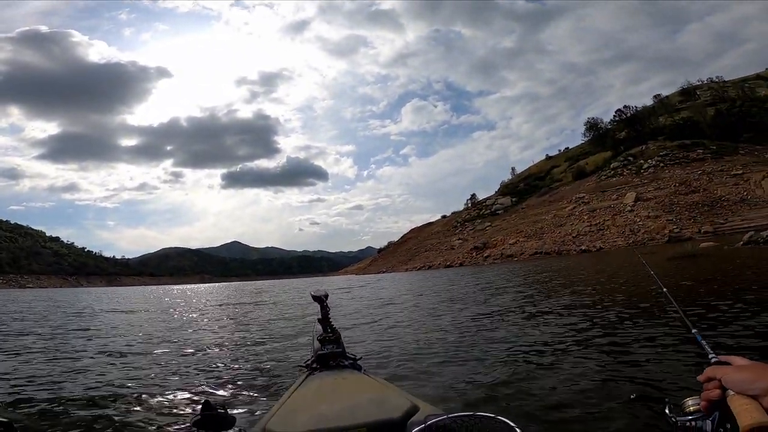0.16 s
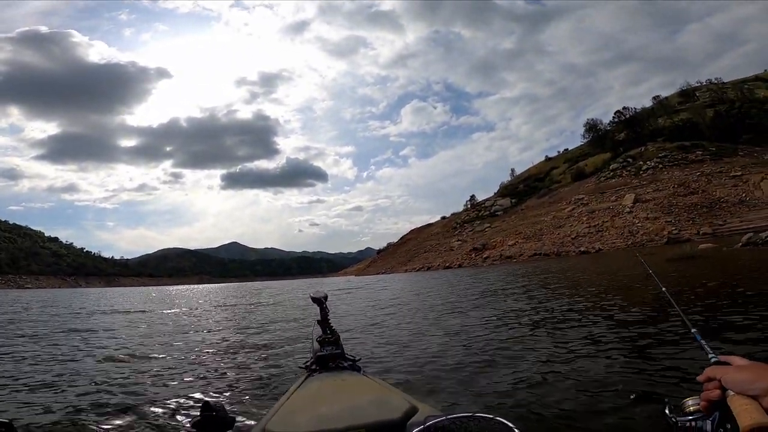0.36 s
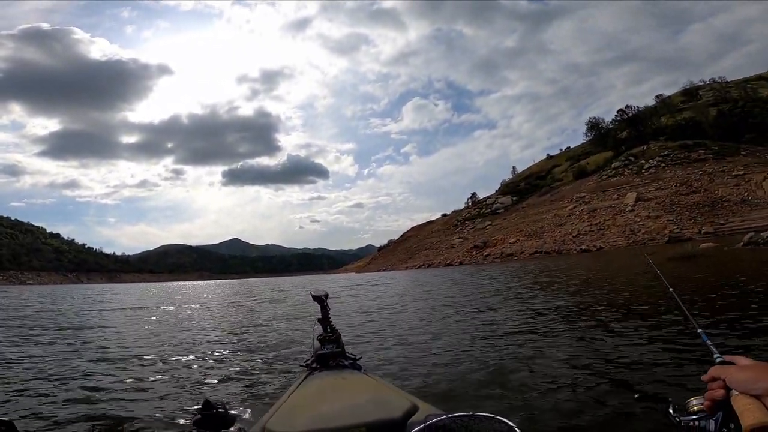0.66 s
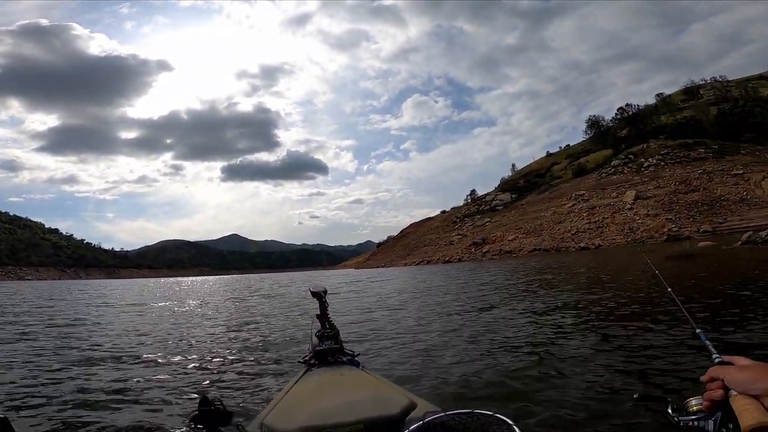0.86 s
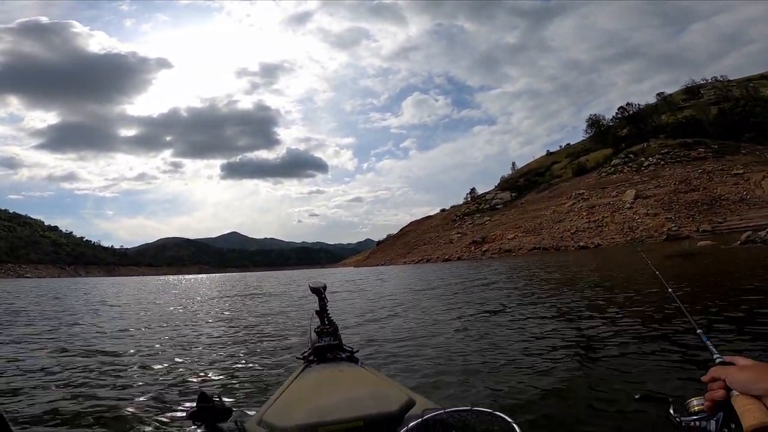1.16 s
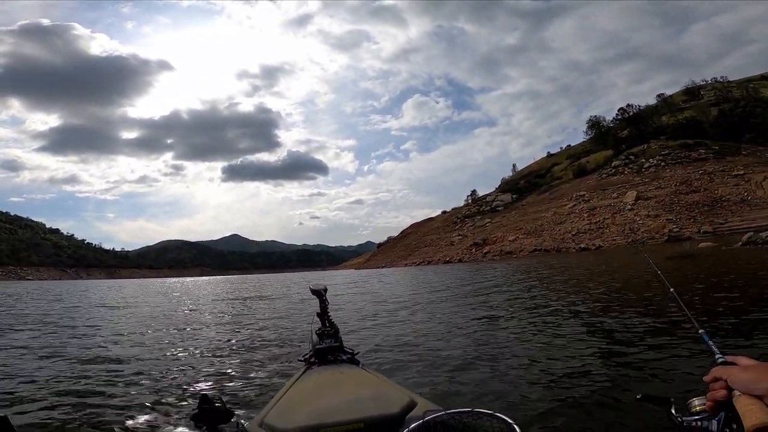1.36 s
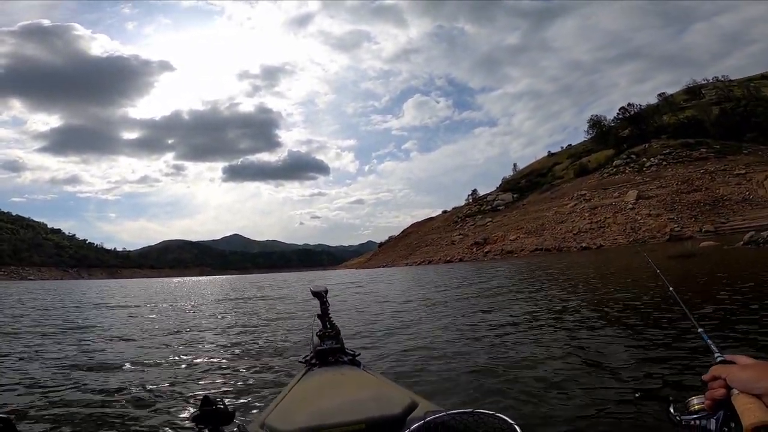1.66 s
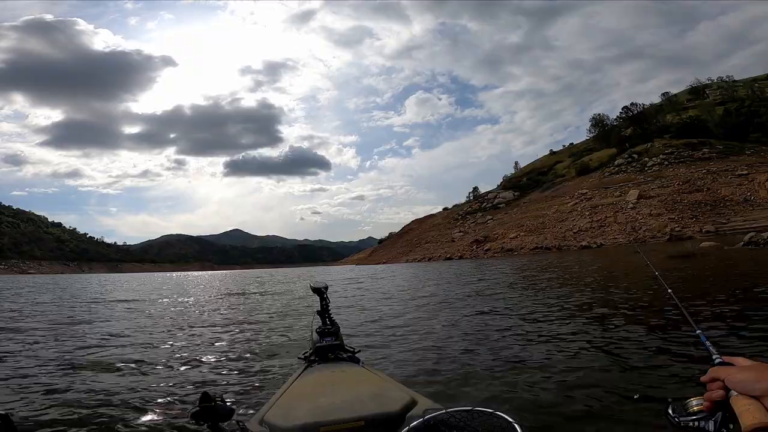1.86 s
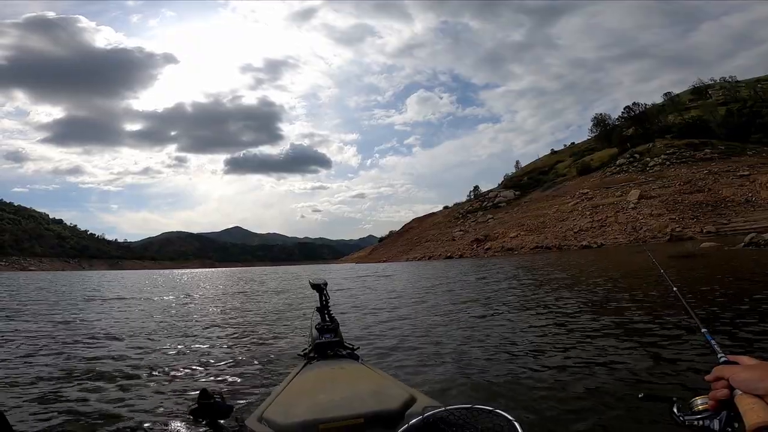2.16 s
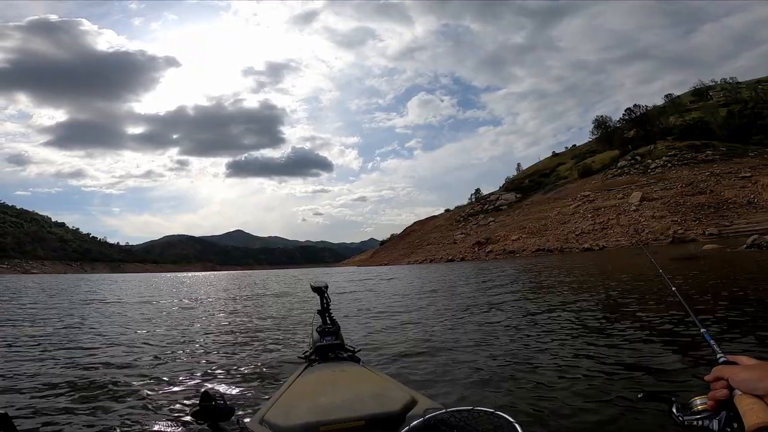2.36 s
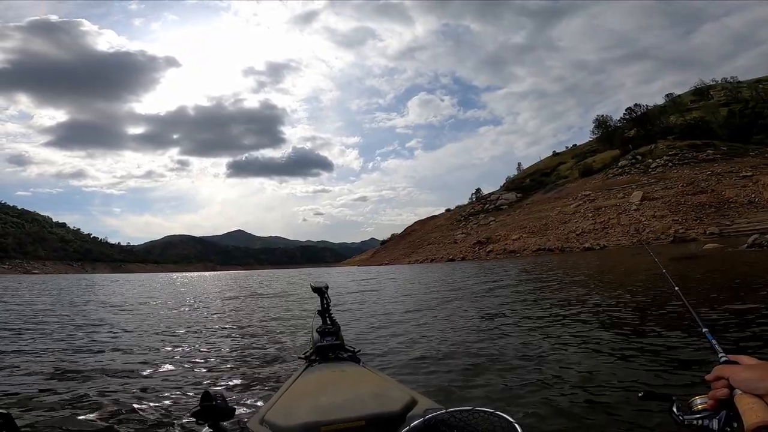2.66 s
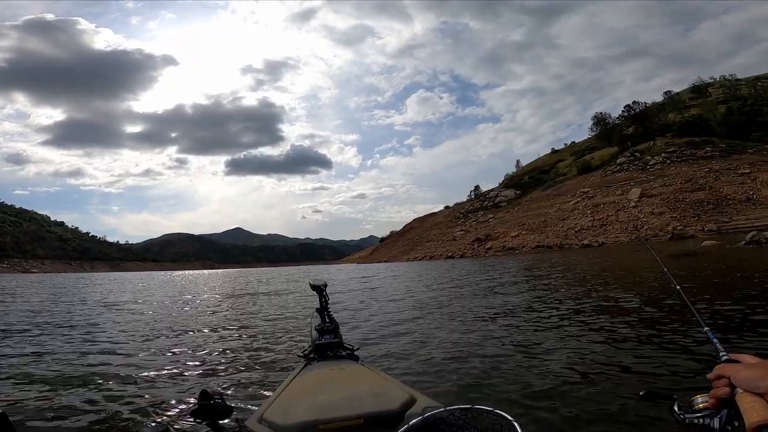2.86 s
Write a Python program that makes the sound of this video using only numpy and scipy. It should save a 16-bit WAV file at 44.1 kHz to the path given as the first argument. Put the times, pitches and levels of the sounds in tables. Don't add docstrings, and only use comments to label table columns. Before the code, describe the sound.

Small waves lap a hollow plastic kayak, close and quiet, in mono outdoors. A soft slap at 0.15 s, deep thuds around 0.4-0.6, hollow knocks at 0.8-0.9. A splashy, bubbly cluster runs 1.3-1.6, then ticking drips. Low glugs at 2.1, the sharpest plop and splash at 2.5, then bubbles and drips to the end. Faint trickling, low wind and hull rumble, and a dull distant wash lie beneath.

```python
import sys
import numpy as np
from scipy import signal
from scipy.fft import rfft, irfft, next_fast_len
from scipy.io import wavfile
from scipy.ndimage import uniform_filter1d, map_coordinates

SR = 44100
rng = np.random.default_rng(int(sys.argv[2]) if len(sys.argv) > 2 else 0)


def pcm_store(signal):
    levels = np.round(np.clip(np.atleast_2d(signal), -1, 1) * 32767)
    wavfile.write(sys.argv[1], SR, levels.astype(np.int16).T)


def voltage_ratio(level):
    return 10 ** (np.asarray(level, float) / 20)


N = 132300


def unit(x):
    return x / np.sqrt(np.mean(x ** 2) + 1e-20)


def level_at_each_sample(rows):
    times_s, levels_db = np.transpose(rows)
    return voltage_ratio(np.interp(np.arange(N) / SR, times_s, levels_db))


def wobble(rate):
    knots = rng.standard_normal(400)
    return map_coordinates(knots, [np.arange(N) * rate / SR])


def coloured(x, points):
    size = next_fast_len(N + 8192)
    point_hz, point_db = np.transpose(points)
    hz = np.fft.rfftfreq(size, 1 / SR)
    gain_db = np.interp(np.log(hz + 1), np.log(point_hz + 1), point_db, right=-120)
    return irfft(rfft(x, size) * voltage_ratio(gain_db), size)[:N]


def rush(points, patchy_db):
    spectrum = signal.stft(rng.standard_normal(N), nperseg=256)[2]
    patches = uniform_filter1d(rng.standard_normal(spectrum.shape), size=6, axis=0)
    patches = unit(uniform_filter1d(patches, size=6, axis=1))
    noise = signal.istft(spectrum * voltage_ratio(patchy_db * patches), nperseg=256)[1][:N]
    return unit(coloured(noise, points))


def pings(start_s, level_db, hz, cycles, rise, soft, size):
    t = np.arange(size) / SR
    age = t * (hz / np.maximum(cycles, 0.3))[:, None]
    fade_out = np.cos(np.pi / 2 * t / t[-1])
    shape = np.exp(-age) * (1 - np.exp(-age / max(soft, 0.01))) * fade_out
    glide = 1 + rise * np.minimum(age, 4) / 2
    wave = np.sin(2 * np.pi * hz[:, None] * t * glide)
    at = np.round(start_s * SR).astype(int)[:, None] + np.arange(size)
    return np.bincount(at.ravel(), (voltage_ratio(level_db)[:, None] * shape * wave).ravel(), N + size)[:N]


def swarm(centre_hz, spread, cycles, rise, scatter_db, count, size):
    when, big = rng.random((count, 2)).T
    pitch, life = rng.standard_normal((count, 2)).T
    hz = centre_hz * np.exp(spread * np.clip(pitch, -2, 2))
    level_db = -scatter_db * np.log(1.05 - big) - 4 * spread * pitch
    lifetimes = cycles * np.exp(0.4 * life)
    return unit(pings(when * N / SR, level_db, hz, lifetimes, rise, soft=1.0, size=size))


def camera_hiss():
    # frequency_hz, gain_db
    hiss_colour = [(100, -5), (700, -14), (6500, -30.5), (11500, -50), (14300, -44.5), (15500, -52)]
    return voltage_ratio(-71.5) * rush(hiss_colour, patchy_db=1)


def far_shore():
    # time_s, level_db
    shore_level = [(0, -94.5), (1.55, -72), (1.72, -64), (2.3, -61), (2.55, -65.5), (3, -74)]
    # frequency_hz, gain_db
    shore_colour = [(800, -21), (1400, -4.5), (1850, -1.5), (2200, -16), (3300, -15.5), (10000, -42.5),
                    (14300, -45.5)]
    return level_at_each_sample(shore_level) * rush(shore_colour, patchy_db=-4.5)


def breeze():
    # time_s, level_db
    gusts = [(0, -59), (.33, -55.5), (.4, -46), (.75, -45), (.95, -49), (1.1, -55), (1.24, -45),
             (1.45, -48), (1.65, -54.5), (2.02, -56.5), (2.12, -47.5), (2.27, -58.5), (3, -54)]
    # frequency_hz, gain_db
    buffet_colour = [(12, -120), (20, -9.5), (35, -2), (60, -4.5), (120, -18), (300, -57)]
    return voltage_ratio(-0.5) * level_at_each_sample(gusts) * rush(buffet_colour, patchy_db=1.15)


def hull_boom():
    # time_s, level_db
    swell = [(0, -55), (.07, -57.5), (.55, -56), (.75, -58), (.92, -48.5), (1.1, -55.5), (1.25, -54.5),
             (1.55, -53), (2.0, -58.5), (2.18, -50.5), (2.26, -56.5), (2.62, -57.5), (2.85, -55), (3, -55)]
    # frequency_hz, gain_db
    hull_colour = [(60, -17.5), (85, -3.5), (110, 3.5), (140, -7), (200, -9), (500, -30.5)]
    boom = unit(voltage_ratio(0.92 * wobble(15)) * rush(hull_colour, patchy_db=-0.17))
    return voltage_ratio(-2.0) * level_at_each_sample(swell) * boom


def wash():
    # time_s, level_db
    flow = [(0, -69.5), (.1, -73.5), (.22, -75.5), (.3, -70.5), (.53, -67.5), (.65, -70), (.76, -75.5),
            (1.02, -75), (1.1, -72), (1.2, -74), (1.36, -64.5), (1.55, -67.5), (1.85, -67.5), (2.0, -69.5),
            (2.46, -63.5), (2.58, -70.5), (2.85, -68.5), (3, -70)]
    # frequency_hz, gain_db
    trickle_colour = [(150, -24), (500, 1.5), (1100, -6), (1800, -2), (2600, -8.5), (5000, -15),
                      (8500, -19.5), (11500, -39.5), (14500, -44)]
    spurts_db = 2.9 * wobble(22.01) + 1.04 * wobble(45)
    sheet = unit(voltage_ratio(spurts_db) * rush(trickle_colour, patchy_db=3.0))
    gurgle = swarm(centre_hz=600, spread=0.342, cycles=7.9, rise=0.055, scatter_db=-0.5, count=200, size=2000)
    bubbling = swarm(centre_hz=1800, spread=0.416, cycles=5.9, rise=0.042, scatter_db=1.5, count=600, size=900)
    fizz = swarm(centre_hz=5514, spread=0.22, cycles=11, rise=0.0062, scatter_db=1.0, count=600, size=600)
    crackle = swarm(centre_hz=4700, spread=0.36, cycles=0.52, rise=0, scatter_db=2.5, count=300, size=200)
    crackle = coloured(crackle, [(1000, 9.5), (8500, 0.0), (11500, -11), (15000, -18)])
    grains = voltage_ratio(-4) * bubbling + voltage_ratio(-14) * fizz + voltage_ratio(-17.5) * crackle
    water = voltage_ratio(3.0) * sheet + voltage_ratio(-1.0) * gurgle + voltage_ratio(0.23 * spurts_db + 2.0) * grains
    return level_at_each_sample(flow) * water


def surges():
    # start_s, level_db (rms), centre_hz, length_s
    froth = [(.0, -68.5, 1800, 0.015), (0.507, -61, 1350, 0.056), (0.618, -62.5, 710, 0.04),
             (0.81, -63, 625, 0.056), (0.884, -64, 1800, 0.023), (.885, -83, 5130, 0.025),
             (2.397, -68, 3200, 0.097), (0.829, -76, 4270, 0.06), (1.218, -68.5, 3200, 0.024),
             (1.333, -55, 820, 0.038), (1.336, -65.5, 3300, 0.038), (1.455, -68.5, 2630, 0.22),
             (1.452, -58, 320, 0.097), (1.562, -80, 600, 0.016), (2.067, -62.5, 553, 0.11)]
    hz, t, spectrum = signal.stft(rng.standard_normal(N), SR, nperseg=256)
    power = 0
    for start_s, level_db, centre_hz, length_s in froth:
        band = np.exp(-(np.log((hz + 1) / centre_hz) / 0.29) ** 2)
        age_s = np.maximum(t - start_s, 0)
        envelope = (1 - np.exp(-age_s / 0.0037)) * np.exp(-(age_s / length_s) ** 2)
        power = power + voltage_ratio(2 * level_db) * np.outer(band / band.mean(), envelope)
    noise = signal.istft(spectrum * np.sqrt(power), nperseg=256)[1][:N]
    return voltage_ratio(2.67 * wobble(90)) * noise


def ticks():
    # start_s, level_db (peak), centre_hz
    tiny_drops = [(.343, -61.5, 8400), (0.5128, -63, 9000), (0.5624, -64, 9000), (.583, -63, 5300),
                  (0.6325, -59, 7780), (.8853, -63, 5250), (1.034, -70, 7080), (1.074, -61, 4530),
                  (1.2265, -59, 8100), (1.3058, -63, 8310), (1.3487, -57, 8470), (1.498, -56, 6600),
                  (1.618, -56, 5700), (1.653, -53.5, 7300), (1.7019, -59, 6060), (1.709, -60, 9100),
                  (1.771, -58, 6590), (1.813, -55, 4500), (1.8495, -60, 8710), (1.864, -59, 6100),
                  (2.037, -57, 6800), (2.1503, -57, 4950), (2.4393, -55, 5950), (2.454, -54, 6660),
                  (2.633, -56, 5700), (2.66, -63, 5850), (2.775, -62, 6340), (2.802, -65, 8350),
                  (2.8463, -53.5, 6090), (2.9008, -55, 5970), (2.9205, -56, 4540), (2.9576, -59, 5220),
                  (2.9686, -61, 5960)]
    # start_s, level_db (peak)
    spray = [
        (1.709, -74),
        (2.171, -72),
        (2.8992, -74),
        (2.9207, -72),
        (2.9686, -78),
    ]
    start_s, level_db, hz = np.transpose(tiny_drops)
    clicks = pings(start_s, level_db + 6.5, hz, 3.1 + 0 * start_s, rise=0.015, soft=0.1, size=300)
    start_s, level_db = np.transpose(spray)
    hz = 12900 + 0 * start_s
    return clicks + pings(start_s, level_db + 5.5, hz, 3.1 + 0 * start_s, rise=0.015, soft=0.1, size=300)


def splashes():
    # start_s, level_db (peak)
    cracks = [
        (0.438, -62),
        (0.634, -55),
        (1.3761, -44),
        (1.4641, -49.5),
        (1.725, -48.5),
        (2.213, -49),
        (2.4867, -40.5),
        (2.801, -49),
        (2.8305, -57),
    ]
    out, t = np.zeros(N + 1000), np.arange(1000) / SR
    for start_s, level_db in cracks:
        decay = voltage_ratio(level_db - 60 * t / 0.025)
        attack = 1 - np.exp(-t / 0.00054)
        out[round(start_s * SR):][:len(t)] += decay * attack * rng.standard_normal(len(t))
    return coloured(out[:N], [(300, 4), (1200, 2), (3500, 7), (7000, -4.5), (10000, -21), (15000, -43)])


def droplets():
    # start_s, level_db (peak), pitch_hz
    drops = [(0.12, -57.5, 6640), (0.8175, -62, 4650), (0.833, -56, 4120), (.9, -61, 5100),
             (1.048, -60, 7200), (2.797, -59, 5870), (1.281, -57, 6000), (1.514, -50, 6230),
             (1.6536, -54.5, 4700), (1.8128, -56.5, 4120), (2.5282, -53.5, 6760), (2.608, -58.5, 8040),
             (2.6936, -56, 6030)]
    start_s, level_db, hz = np.transpose(drops)
    cycles = 23.4 + 0 * start_s
    return pings(start_s, level_db + 1.5, hz, cycles / 2, rise=0.015, soft=0.2, size=1200)


def small_bubbles():
    # start_s, level_db (peak), pitch_hz
    bubbles = [(0.3285, -51, 1740), (0.6966, -52, 1740), (0.7532, -54, 1230), (1.331, -44.5, 2030),
               (1.3515, -52, 1200), (1.481, -40.5, 1750), (1.5539, -49, 1506), (1.567, -47.5, 2170),
               (1.5886, -44.5, 2500), (2.2623, -62, 1630), (2.6904, -45.5, 1820), (2.7686, -48, 1830),
               (2.8015, -43.5, 3060), (2.8594, -51.5, 3050), (2.9623, -50, 2180), (2.9765, -51, 1800),
               (.268, -61, 2210), (.5272, -51, 2830), (1.04, -60, 1800), (1.1393, -61, 2050),
               (1.1623, -56, 2750), (1.2196, -53, 1470), (1.2521, -52, 2320), (1.4067, -47.5, 3600),
               (1.507, -46.5, 3280), (1.6067, -47.5, 2600), (1.929, -52.5, 2500), (2.6848, -53, 3100),
               (2.708, -53, 2900), (2.721, -52, 2920), (2.762, -55, 2980)]
    start_s, level_db, hz = np.transpose(bubbles)
    cycles = 9.3 + 0 * start_s
    return pings(start_s, level_db + 1.5, hz, cycles / 2, rise=0.04, soft=0.15, size=1500)


def air_pockets():
    # start_s, level_db (peak), pitch_hz, cycles
    glugs = [(0.151, -47.5, 743, 13.7), (0.48, -50, 1020, 16), (1.23, -53, 647, 14),
             (1.286, -52.5, 618, 17), (1.336, -63, 735, 4.8), (1.426, -52.5, 642, 42),
             (2.127, -43, 557, 10.6), (2.147, -44.5, 541, 9.1), (2.487, -30, 866, 3.1),
             (2.494, -48, 467, 14.6), (2.614, -46, 587, 10.3), (2.639, -48.5, 451, 11),
             (2.93, -50, 668, 12), (2.984, -51.5, 454, 6.4), (1.018, -58, 654, 5.7),
             (1.075, -60.5, 1050, 13), (1.115, -60, 1156, 24), (1.348, -55, 694, 9.8),
             (1.49, -52, 472, 9.4), (.893, -55.5, 1910, 30), (.842, -58, 4040, 25),
             (2.665, -52.5, 490, 7.4), (1.665, -51, 695, 5), (2.487, -29.5, 1330, 4.8),
             (0.794, -43.5, 600, 6.2), (0.903, -45.5, 370, 5.9)]
    start_s, level_db, hz, cycles = np.transpose(glugs)
    return pings(start_s, level_db + 1.5, hz, cycles / 2, rise=0.05, soft=0.25, size=3000)


def hull_pushes():
    # start_s, level_db (peak), pitch_hz, cycles
    thuds = [(.377, -35.5, 33, 3.1), (.475, -27.5, 30.8, 0.93), (.611, -23.5, 35.3, 1.35),
             (.615, -33, 95.6, 4.7), (.645, -32, 95.4, 3.2), (1.4525, -37, 125.5, 4.8),
             (1.527, -39, 119.4, 6.2), (1.7, -37, 114.4, 2.9), (2.085, -41, 34, 2.8), (.791, -34, 95, 1.2),
             (.899, -39, 84.5, 3.1)]
    start_s, level_db, hz, cycles = np.transpose(thuds)
    return pings(start_s, level_db + 1.5, hz, cycles / 2, rise=0.01, soft=0.4, size=8000)


def slaps():
    # start_s, level_db (peak), pitch_hz, cycles
    hits = [(0.155, -35, 256, 2), (0.438, -47, 490, 3.6), (0.7943, -37.5, 400, 2.05),
            (0.8929, -30, 274, 1.38), (1.455, -42, 217, 2.2), (1.468, -42, 196, 4.4), (1.486, -50, 200, 9),
            (1.528, -40, 270, 2.4), (1.566, -41, 540, 4.5), (2.409, -49, 387, 3.3), (2.794, -44, 355, 3.6)]
    start_s, level_db, hz, cycles = np.transpose(hits)
    knock = pings(start_s, level_db + 1.5, hz, cycles / 2, rise=-0.05, soft=0.2, size=3000)
    answer = pings(start_s + 0.0017, level_db - 9.5, 0.46 * hz, cycles / 2, rise=-0.0028, soft=0.074, size=3000)
    return knock + answer


def scene():
    background = camera_hiss() + far_shore() + breeze() + hull_boom()
    water = wash() + surges() + ticks() + splashes()
    laps = droplets() + small_bubbles() + air_pockets() + hull_pushes() + slaps()
    return (background + water + laps)[None]


def roll_off(x):
    return signal.sosfilt(signal.butter(12, 15590, fs=SR, output="sos"), x)


def record(dry):
    return roll_off(dry)


dry = scene()
out = record(dry)
pcm_store(out)
```